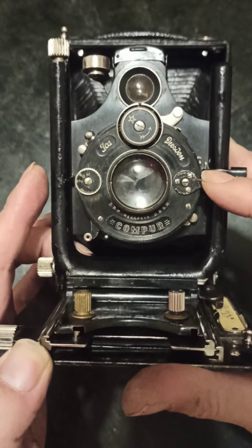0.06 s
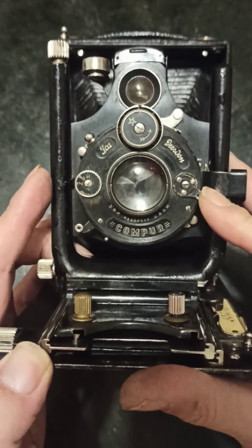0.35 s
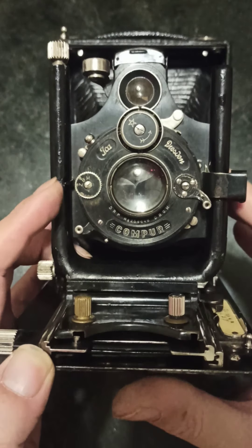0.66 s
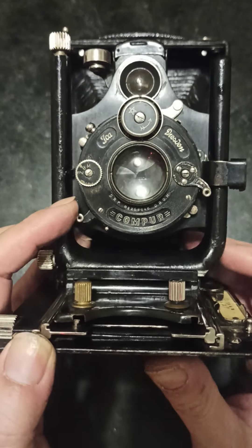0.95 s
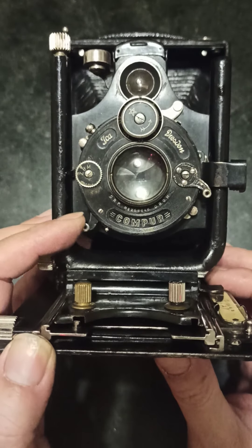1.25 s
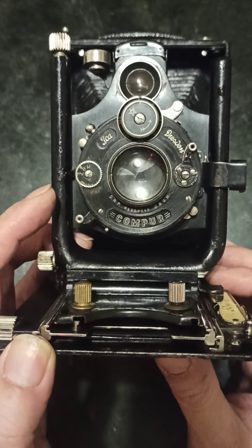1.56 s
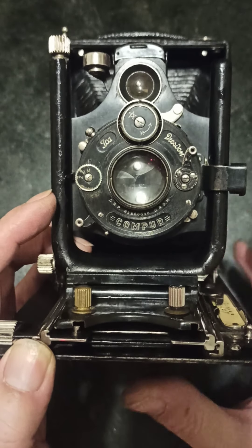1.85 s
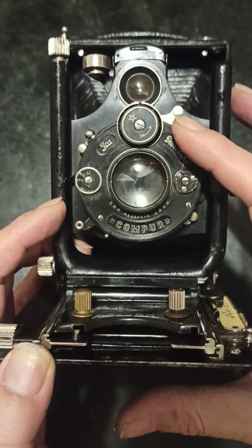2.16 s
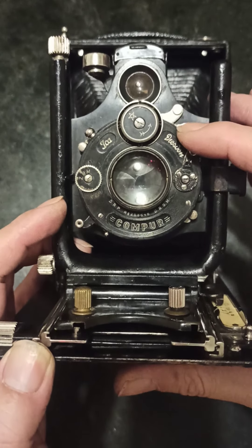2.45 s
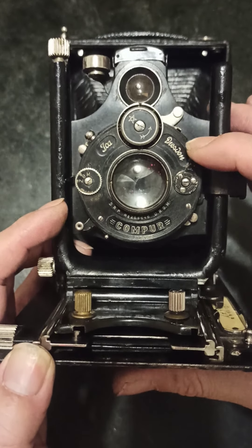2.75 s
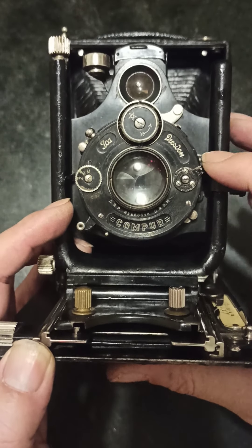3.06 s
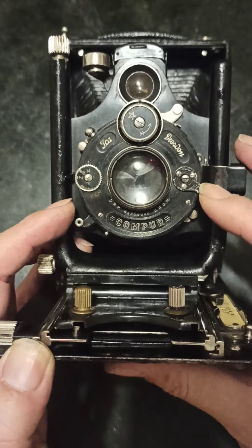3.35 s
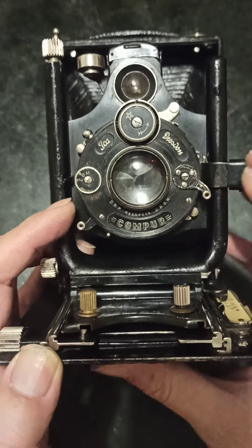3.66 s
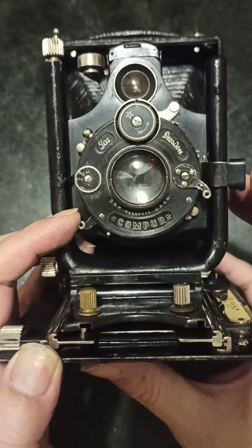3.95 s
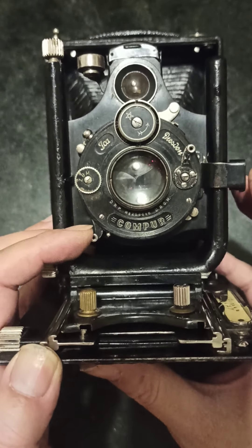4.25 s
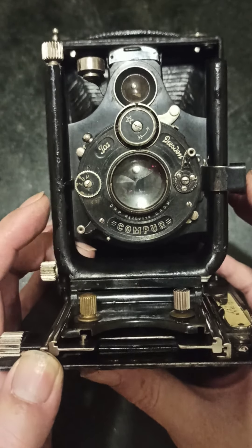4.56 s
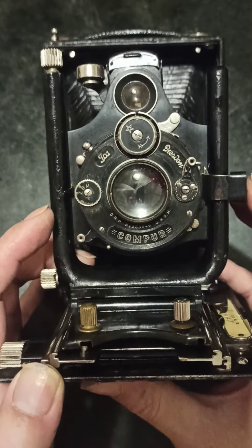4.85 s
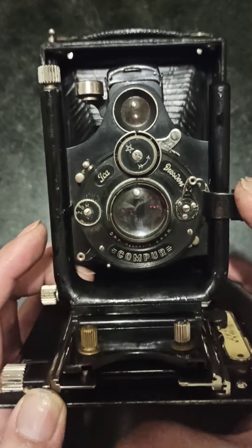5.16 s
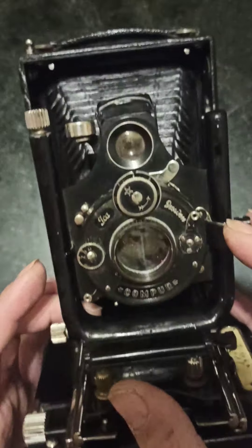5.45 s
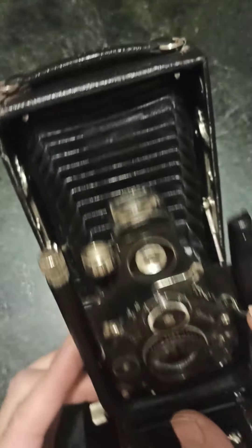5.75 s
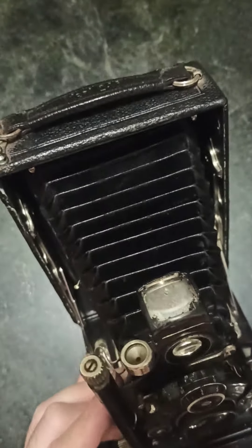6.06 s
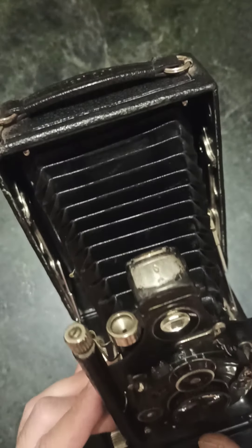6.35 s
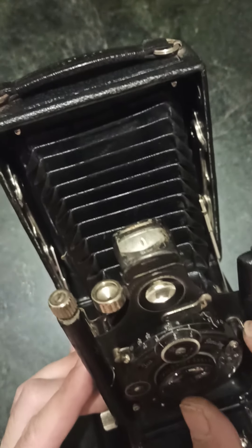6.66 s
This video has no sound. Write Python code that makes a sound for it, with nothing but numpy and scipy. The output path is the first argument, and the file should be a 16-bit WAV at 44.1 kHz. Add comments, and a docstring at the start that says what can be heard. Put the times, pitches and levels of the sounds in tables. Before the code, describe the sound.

An old folding camera's shutter is cocked and fired twice with sharp metallic clicks, followed by a hollow knock, in a quiet small room.

```python
"""Folding camera, close up

An old folding camera, held close to a stereo microphone in a small room, is cocked and fired twice.
The leaf shutter's steel levers snap against their stops, and its gear train whirs between the snaps.
Fingers rub on the leather, and the hollow case takes a knock as it is tilted.
Across the room a clock ticks over a low rumble and a faint hiss."""
import sys
import numpy as np
from scipy import signal
from scipy.fft import rfft, irfft
from scipy.io import wavfile
from scipy.ndimage import uniform_filter1d

SR = 44100
rng = np.random.default_rng(int(sys.argv[2]) if len(sys.argv) > 2 else 0)


def pcm_store(signal):
    """Save signal as 16-bit PCM."""
    levels = np.round(np.clip(np.atleast_2d(signal), -1, 1) * 32767)
    wavfile.write(sys.argv[1], SR, levels.astype(np.int16).T)


N = 296330
T = np.arange(N) / SR
SHORT = T[:SR // 2]
BLOW_SAMPLES = .002 * SR  # a blow's level is its energy spread over 2 ms

# Tone colours. Each row: frequency in Hz, relative level in dB.
RUMBLE_COLOUR = [(15, -69.5), (25, -44.5), (48, -22.5), (106, -6), (162, -3), (202, -7), (230, -6),
                 (261, -10), (630, -17.5), (2000, -33), (2600, -63.5), (4400, -120)]  # the low end of the room tone
HISS_COLOUR = [(500, 1.5), (2000, 4), (3000, 2), (4300, 4.5), (5200, -4.5), (6700, 2), (8500, -4),
               (12000, -5.5), (15500, 0)]  # the even hiss above it
CLOCK_COLOUR = [(200, -7), (850, 7), (1400, -4.5), (2800, -3.5), (4200, -3), (5400, -10), (6500, -2.5),
                (9000, -17.5), (15000, -30.5)]  # a tick from across the room
SKIN_COLOUR = [(150, -8.5), (600, -2.5), (1500, 4), (2800, -0.5), (4200, -1.5), (5300, -7), (7000, 4.5),
               (9000, -6), (15000, -15)]  # sliding fingertips
LEATHER_COLOUR = [(35, -44.5), (80, -19), (250, 5), (430, 1.5), (600, -4), (880, 0.5), (1450, -6.5),
                  (2200, -8.5), (3000, -21), (6000, -60), (15000, -57)]  # the covering of the case
STRUT_COLOUR = [(300, -24), (1100, -29), (1450, 7.5), (2000, -9), (2900, -16), (3700, 8), (4300, -4),
                (5200, -11.5), (6400, 7), (7300, 9), (8500, 2.5), (13000, -25)]  # loose folding struts and rails
LEVER_COLOUR = [(100, -29.5), (600, -24.5), (1300, -18.5), (2000, -14.5), (2900, -16), (4400, -4),
                (5300, -13.5), (6400, 3), (7600, 4.5), (8800, -7), (12000, -18.5), (15000, -10.5)]  # the shutter's small outer levers
HOUSING_COLOUR = [(40, -37.5), (250, -19.5), (550, -18.5), (1100, -10), (1900, -2.5), (2700, -8.5),
                  (3400, -7), (4200, -4), (5300, -10.5), (6500, -8), (7700, -1.5), (8800, 0.5),
                  (12000, -11.5), (15500, -11.5)]  # its steel housing
MAINSPRING_COLOUR = [(500, -28.5), (950, -9.5), (1220, 1), (1520, 1), (2100, -8), (2800, -15.5), (4200, -2),
                     (6000, -12.5)]  # its scraping mainspring
# The small room's reverberation. Each row: frequency in Hz, t60 in seconds, level in dB.
ROOM_BANDS = [(151, 0.34, -7.5), (599, 0.36, -6.5), (1930, 0.39, -14), (4687, 0.33, -8),
              (7804, 0.34, -11.5), (14020, 0.15, -9)]
# Resonances. Each row: frequency in Hz, relative level in dB, t60 in seconds.
SQUEAK_MODES = [(1442, 3, .05), (3620, -11, .02)]  # a gripping fingertip
CASE_MODES = [(99.6, -5, 0.3), (153, -3.5, 0.21), (180.5, 2.5, 0.21), (221, -1.5, .13), (287, -3, 0.12),
              (387, -2, 0.14), (435, -2.5, 0.18)]  # the hollow case and bellows
SPRING_MODES = [(1608, -2.5, .2), (1781, -1, .18), (1924, -0.5, .17), (2140, -9.5, .1), (3730, -10, .12),
                (3940, -6, .13), (4100, -7, .12), (4375, -5.5, .13), (4600, -6.5, 0.17), (6420, -5.5, .15),
                (7040, -1.5, .12), (7130, 0.5, .13), (7226, -4.5, .16), (7700, 2, .14)]  # springs inside the housing

# Fingers sliding on leather and metal.
# Each row: start and end in seconds, level in dB, leather rumble in dB relative to that level.
FINGER_RUBS = [(0.199, 0.305, -56.5, -9), (0.82, 0.974, -61, -5), (2.344, 2.489, -69.5, -3),
               (2.807, 2.891, -64, -21), (3.327, 3.385, -63, -7), (3.585, 3.681, -62, -8),
               (5.358, 5.547, -62.5, -3.5), (5.555, 5.828, -69.5, -1), (6.025, 6.128, -75.5, 10),
               (6.58, 6.743, -63.5, -13)]
# A fingertip grips and squeaks. Each row: start and end in seconds, level in dB.
FINGER_SQUEAKS = [(.139, .173, -61), (3.326, 3.38, -66), (6.574, 6.74, -63.5)]
# Blows on the case. Each row: start in seconds, level in dB, contact t60 in seconds,
# hollow boom in dB relative to the blow.
CASE_KNOCKS = [(.959, -46.5, 0.098, -11), (2.886, -55, .04, 9), (5.374, -44.5, 0.098, -0.5),
               (5.7974, -28.5, 0.033, 0), (6.003, -39, 0.025, -21), (6.111, -45.5, 0.038, -6)]
# Light ticks of trigger, nails and fittings. Each row: start in seconds, level in dB, t60 in seconds.
HANDLING_TICKS = [(.827, -49.5, 0.022), (1.5792, -29, .01), (2.369, -54.5, .013), (2.8867, -32.5, 0.015),
                  (3.3826, -45.5, 0.039), (3.602, -44.5, 0.027), (4.4598, -35, 0.022),
                  (4.9686, -42, 0.0089), (5.8069, -35, 0.012), (6.092, -54.5, 0.017), (6.286, -51, .008)]
# Cocking the shutter. Each row: times of the pawl's catch, the hardest scrape and the latch in seconds,
# levels of catch, latch and scrape in dB, mainspring ring in dB relative to the scrape.
SHUTTER_COCKINGS = [(0.2712, 0.301, 0.27, -18.5, -20.5, -21, -8),
                    (3.4076, 3.436, 3.4463, -16, -17, -31, -14.5)]
# Firing the shutter. Each row: times the blades open and shut in seconds, snap level in dB,
# gear train level in dB, t60 of the shutting chatter in seconds.
SHUTTER_FIRINGS = [(1.3547, 1.3882, -9.5, -26.5, 0.011), (4.1967, 4.2406, -11, -21, .022)]


def undb(db):
    """Decibels to gain."""
    return 10 ** (np.asarray(db) / 20)


def unit(x):
    """Scale to unit energy per channel."""
    return x / np.sqrt(np.sum(x ** 2, axis=-1, keepdims=True))


def fade(t, t60):
    """Exponential decay, 60 dB down after t60 seconds."""
    return np.exp(-np.log(1000) * t / t60)


def pan(db):
    """Constant-power gains, with the left channel db louder than the right."""
    gains = undb([[db / 2], [-db / 2]])
    return gains / np.sqrt(np.mean(gains ** 2))


def add(out, start_s, x):
    """Mix x into out from start_s on."""
    i = int(start_s * SR)
    out[..., i:i + x.shape[-1]] += x[..., :N - i]


def ring(x, response):
    """Pass a sound through an impulse response."""
    return signal.fftconvolve(np.atleast_2d(x), np.atleast_2d(response), axes=-1)[:, :x.shape[-1]]


def colour(points, size=4096):
    """Minimum-phase response of unit energy through (Hz, dB) points."""
    hz, db = np.transpose(points)
    bin_hz = np.arange(size // 2 + 1) * SR / size
    gain = undb(np.interp(np.log(bin_hz + 1), np.log(hz), db))
    cepstrum = irfft(np.log(gain))
    cepstrum[1:size // 2] *= 2
    cepstrum[size // 2 + 1:] = 0
    return unit(irfft(np.exp(rfft(cepstrum))))


def modes(table, spread_rad):
    """Decaying tones of unit total energy; each reaches left and right in its own phase."""
    tones = 0
    for hz, db, t60 in table:
        phase = 2 * np.pi * hz * SHORT + spread_rad * rng.standard_normal((2, 1))
        tones += undb(db) * unit(fade(SHORT, t60) * np.cos(phase))
    return unit(tones)


def near_noise(count, lag_samples=8):
    """Noise close to the microphone: it arrives on the left first; each side also has a part of its own."""
    shared, left, right = rng.standard_normal((3, count))
    return np.array([shared + left, np.roll(shared, lag_samples) + right])


def chatter(t60, rise_s=.0004, count=4096, smooth_bins=180):
    """Two parts chatter briefly on contact, their energy spread evenly over the spectrum."""
    t = T[:count]
    envelope = fade(t, t60) * (1 - np.exp(-t / rise_s))
    spectrum = rfft(near_noise(count) * envelope, 2 * count)
    even = spectrum / np.sqrt(uniform_filter1d(abs(spectrum) ** 2, smooth_bins))
    return unit(irfft(even)[:, :count]) * np.sqrt(BLOW_SAMPLES)


def room_tone(rumble_db=-61, hiss_db=-66, apart_db=-3):
    """Steady rumble, partly alike on both sides of the microphone, under an even hiss."""
    noise = rng.standard_normal(N) + undb(apart_db) * rng.standard_normal((2, N))
    rumble = ring(noise * pan(3), colour(RUMBLE_COLOUR))
    hiss = ring(rng.standard_normal((2, N)), colour(HISS_COLOUR))
    return rumble * undb(rumble_db) / np.std(rumble.mean(axis=0)) + hiss * undb(hiss_db)


def clock(first_tick_s=.195, swell_s=.015, tail_t60=.51, tick_db=-56):
    """A clock across the room ticks once a second; only its smeared reverberation arrives."""
    since_tick = (T - first_tick_s) % 1
    envelope = (1 - np.exp(-since_tick / swell_s)) * fade(since_tick, tail_t60)
    return ring(rng.standard_normal((2, N)) * envelope, colour(CLOCK_COLOUR)) * undb(tick_db)


def room_echo(x, first_wall_s=.0027, build_s=.0061):
    """Diffuse reflections build up after the nearest wall and die soonest in the high treble."""
    hz, t60, db = np.transpose(ROOM_BANDS)
    t = T[:SR * 3 // 4]
    spectrum = rfft(rng.standard_normal((2, len(t))))
    bin_hz = np.arange(spectrum.shape[1]) * SR / len(t)
    band_position = np.interp(np.log(bin_hz + 1), np.log(hz), np.arange(len(hz)))
    onset = 1 - np.exp(-np.maximum(t - first_wall_s, 0) / build_s)
    response = 0
    for k in range(len(hz)):
        band = irfft(spectrum * np.maximum(1 - abs(band_position - k), 0), len(t))
        response += band * unit(onset * fade(t, t60[k])) * undb(db[k])
    return ring(x, response)


def strokes(table):
    """Each stroke of a finger swells, holds and eases off."""
    envelope = 0
    for start, end, db in table:
        from_middle = np.minimum(abs(2 * (T - start) / (end - start) - 1), 1)
        envelope += undb(db) * np.sqrt(1 - from_middle ** 4)
    return envelope


def fingers(grain_db=1.5, step_samples=128):
    """Skin slips in tiny uneven steps and rumbles on the leather; where it grips, it squeaks faintly."""
    step_gains = undb(grain_db * rng.standard_normal(N // step_samples + 1))
    grain = np.repeat(step_gains, step_samples)[:N]
    friction = unit(rng.standard_normal((2, N)) * grain) * np.sqrt(N) * pan(3)
    slip = strokes([(start, end, db) for start, end, db, _ in FINGER_RUBS])
    press = strokes([(start, end, db + leather_db) for start, end, db, leather_db in FINGER_RUBS])
    rub = ring(friction * slip, colour(SKIN_COLOUR))
    rumble = ring(friction * press, colour(LEATHER_COLOUR))
    squeak = ring(friction * strokes(FINGER_SQUEAKS), modes(SQUEAK_MODES, spread_rad=.43))
    return rub + rumble + squeak


def case_knocks(struts_db=-18, struts_t60=.0095, loose_db=-36.5, rattle_db_per_db=2.7353):
    """A dull tap on leather booms in the hollow case; a blow above loose_db shakes the struts loose."""
    taps, rattles, booms = np.zeros((3, 2, N))
    hollow = modes(CASE_MODES, spread_rad=1) * np.sqrt(BLOW_SAMPLES)
    for start, db, t60, boom_db in CASE_KNOCKS:
        gain = undb(db) * pan(3)
        rattle_db = struts_db + rattle_db_per_db * max(db - loose_db, 0)
        add(taps, start, chatter(t60) * gain)
        add(rattles, start, chatter(struts_t60) * undb(rattle_db) * gain)
        add(booms, start, hollow * undb(boom_db) * gain)
    return ring(taps, colour(LEATHER_COLOUR)) + ring(rattles, colour(STRUT_COLOUR)) + booms


def handling(pan_db=3, share=.38):
    """The returning trigger, fingernails and loose fittings each give one light snap."""
    return [(start, db, t60, pan_db, share) for start, db, t60 in HANDLING_TICKS]


def gear_run(seconds, first_db, last_db, tooth_hz=390, tooth_t60=.0267, uneven_db=-1.7):
    """Tooth after tooth ticks past the pawl, so fast that the ticks merge into a rasp."""
    t = T[:max(int(seconds * SR), 2)]
    teeth_passed = t * tooth_hz
    tooth_gains = undb(uneven_db * rng.standard_normal(256))
    ticks = fade(teeth_passed % 1 / tooth_hz, tooth_t60) * tooth_gains[teeth_passed.astype(int)]
    rasp = unit(near_noise(len(SHORT))[:, :len(t)] * ticks) * np.sqrt(len(t))
    return rasp * undb(np.linspace(first_db, last_db, len(t)))


def cocking(swell_s=.008, ease_s=.021, ratchet_spring_db=-19, pan_db=6, share=.16):
    """Pawl and lever snap, the mainspring scrapes tight; the ratchet runs if the latch comes later."""
    snaps, runs = [], []
    for catch, tight, latch, catch_db, latch_db, scrape_db, ring_db in SHUTTER_COCKINGS:
        snaps += [(catch - .005, catch_db - 9, .0071, pan_db, share),  # the pawl's first touch
                  (catch, catch_db, .014, pan_db, share),
                  (latch, latch_db, .018, pan_db, share),
                  (latch + .013, latch_db - 11, .014, pan_db, share)]  # the lever rebounds
        runs += [(catch, latch, catch_db - 19, catch_db - 16, pan_db, share, ratchet_spring_db),
                 (tight - swell_s, tight, scrape_db - 10, scrape_db, pan_db, share, ring_db),
                 (tight, tight + ease_s, scrape_db, scrape_db - 10, pan_db, share, ring_db)]
    return snaps, runs


def firing(travel_s=.0046, bounce_s=.0016, engage_s=.015, drive_t60=.012, stop_t60=.0046,
           drive_pan_db=6, stop_pan_db=2.5, shut_pan_db=3, gears_pan_db=-.5,
           drive_share=.6, stop_share=.83, shut_share=.48, gears_share=.16, gears_spring_db=-23):
    """The drive lever snaps, the blades hit their stop and bounce, gears swell, a double snap shuts."""
    snaps, runs = [], []
    for opens, shuts, db, gears_db, shut_t60 in SHUTTER_FIRINGS:
        stop, last_snap = opens + travel_s, shuts + travel_s
        snaps += [(opens, db, drive_t60, drive_pan_db, drive_share),
                  (stop, db - 1, stop_t60, stop_pan_db, stop_share),
                  (stop + bounce_s, db - 7, stop_t60, stop_pan_db, drive_share)]
        snaps += [(start, db + 2.26, shut_t60, shut_pan_db, shut_share) for start in (shuts, last_snap)]
        runs.append((opens + engage_s, last_snap, gears_db - 6, gears_db,
                     gears_pan_db, gears_share, gears_spring_db))
    return snaps, runs


def recoil(hz=150, t60=.0043, relative_db=-21):
    """Each firing jolts the camera: one low, quickly damped thump."""
    jolts = np.zeros((2, N))
    jolt = unit(np.sin(2 * np.pi * hz * SHORT) * fade(SHORT, t60)) * np.sqrt(BLOW_SAMPLES)
    for opens, _, db, *_ in SHUTTER_FIRINGS:
        add(jolts, opens, jolt * undb(db + relative_db) * pan(6))
    return jolts


def shutter(springs_db=-13):
    """Snaps and gear runs sound the levers; the share that enters the housing rings it and its springs."""
    lever, housing, winding = np.zeros((3, 2, N))
    cock_snaps, cock_runs = cocking()
    fire_snaps, fire_runs = firing()
    for start, db, t60, pan_db, share in cock_snaps + fire_snaps + handling():
        force = chatter(t60) * undb(db) * pan(pan_db)
        add(lever, start, force * (1 - share))
        add(housing, start, force * share)
    for start, end, first_db, last_db, pan_db, share, mainspring_db in cock_runs + fire_runs:
        force = gear_run(end - start, first_db, last_db) * pan(pan_db)
        add(lever, start, force * (1 - share))
        add(housing, start, force * share)
        add(winding, start, force * undb(mainspring_db))
    steel = ring(lever, colour(LEVER_COLOUR)) + ring(housing, colour(HOUSING_COLOUR))
    springs = undb(springs_db) * ring(housing, modes(SPRING_MODES, spread_rad=2))
    mainspring = ring(winding, colour(MAINSPRING_COLOUR))
    return steel + springs + mainspring + recoil()


def scene():
    """The camera close up and a little to the left, its echo all round, clock and room tone behind."""
    camera = shutter() + case_knocks() + fingers()
    return camera + room_echo(camera[0]) * pan(2) + clock() + room_tone()


def record(dry, ceiling=.81, bass_hz=48, top_hz=15900, self_noise_db=-83,
           dip_hz=10080, dip_half_width_hz=1400, dip_db=-25):
    """The microphone rounds hard peaks, loses deep bass and hisses faintly.
    A narrow treble band near 10 kHz is cut away, and so is the very top."""
    rounded = ceiling * np.tanh(dry / ceiling)
    low_cut = signal.butter(2, bass_hz, "high", fs=SR, output="sos")
    high_cut = signal.ellip(8, .2, 70, top_hz, fs=SR, output="sos")
    hz = np.arange(N // 2 + 1) * SR / N
    dip = undb(dip_db * np.exp(-((hz - dip_hz) / dip_half_width_hz) ** 8))
    dulled = irfft(rfft(signal.sosfilt(low_cut, rounded)) * dip, N)
    self_noise = undb(self_noise_db) * rng.standard_normal((2, N))
    return signal.sosfilt(high_cut, dulled + self_noise)


dry = scene()
out = record(dry)
pcm_store(out)
```